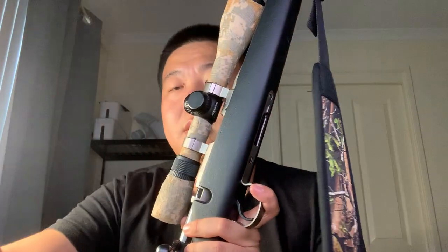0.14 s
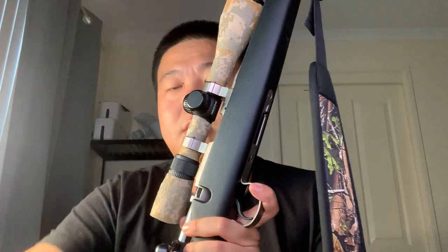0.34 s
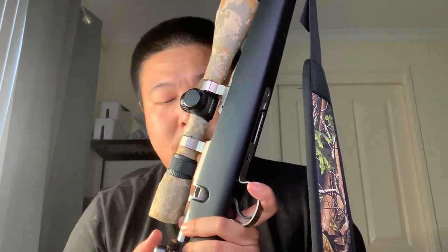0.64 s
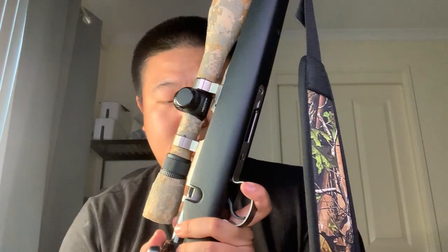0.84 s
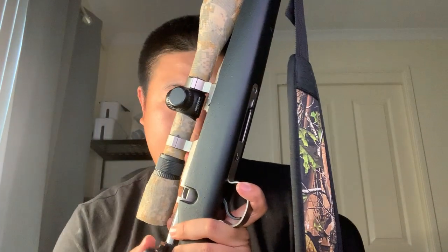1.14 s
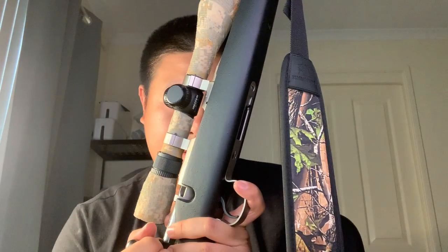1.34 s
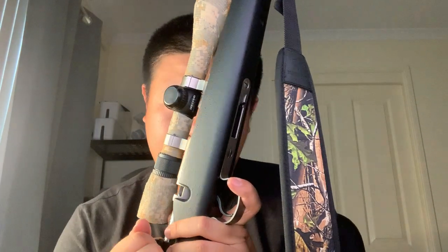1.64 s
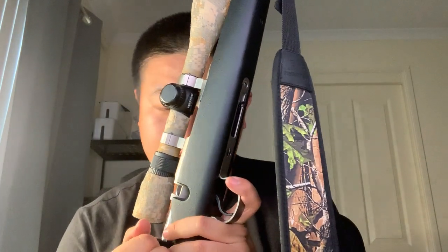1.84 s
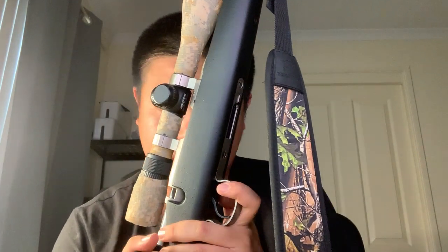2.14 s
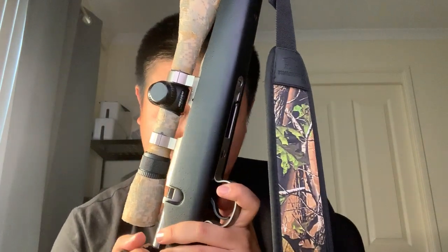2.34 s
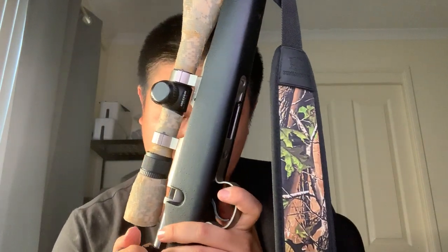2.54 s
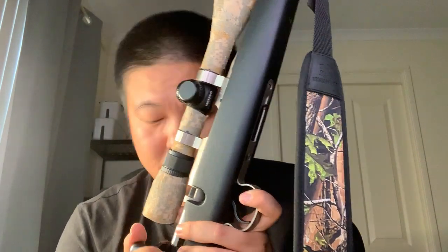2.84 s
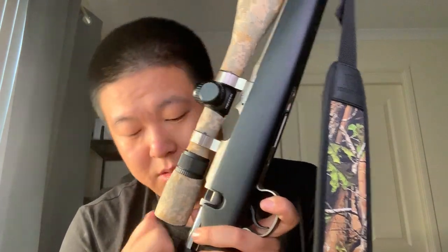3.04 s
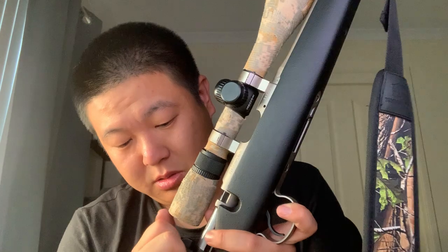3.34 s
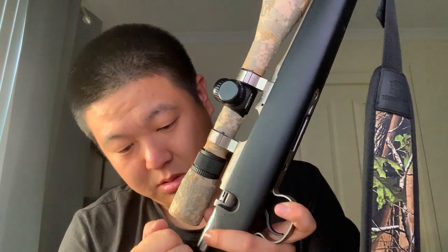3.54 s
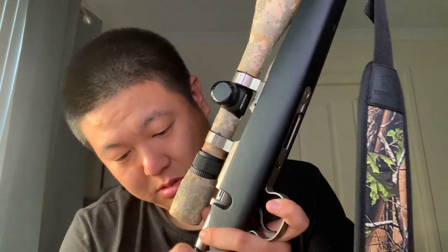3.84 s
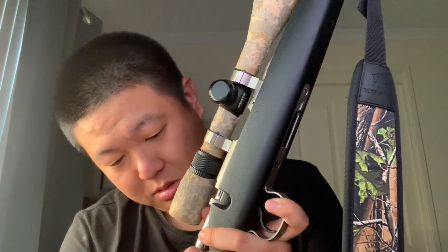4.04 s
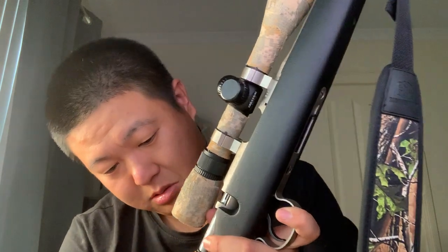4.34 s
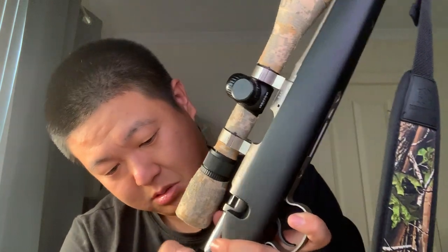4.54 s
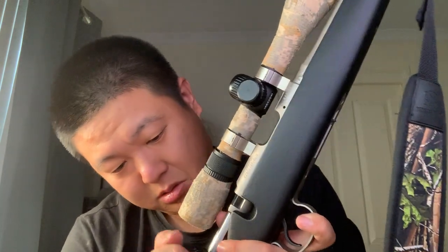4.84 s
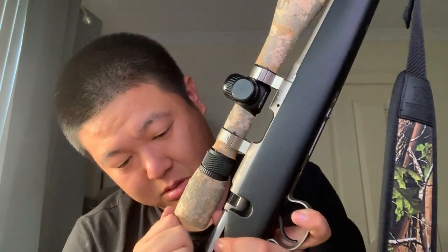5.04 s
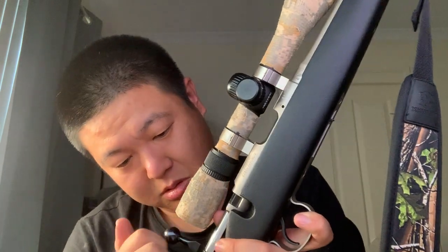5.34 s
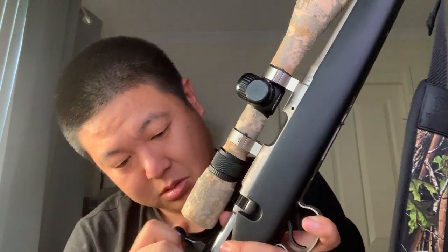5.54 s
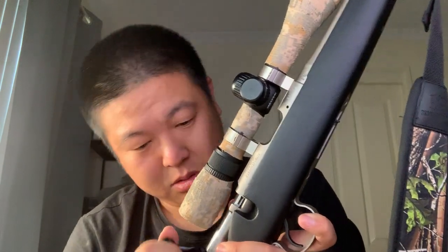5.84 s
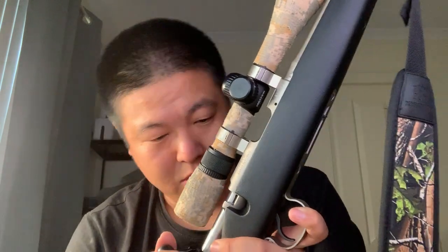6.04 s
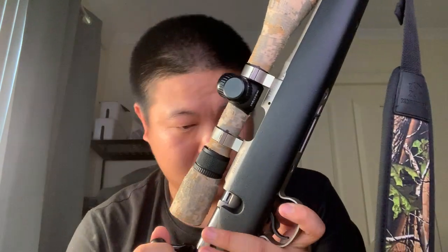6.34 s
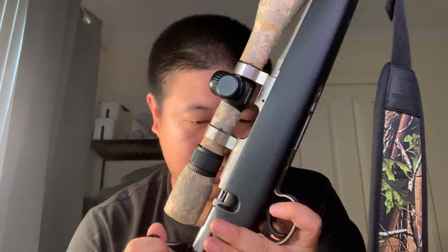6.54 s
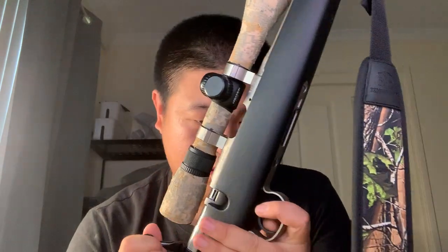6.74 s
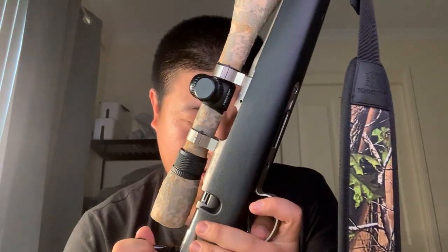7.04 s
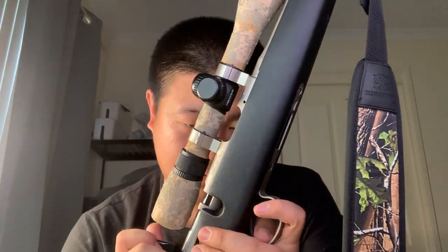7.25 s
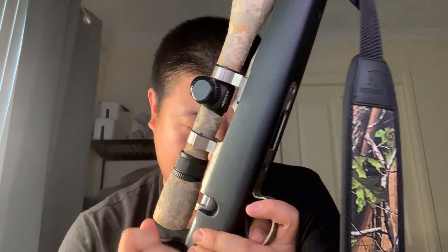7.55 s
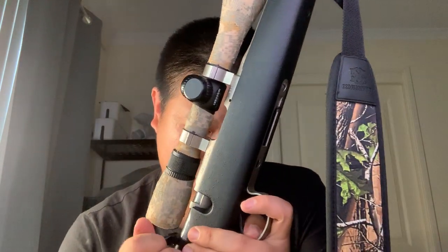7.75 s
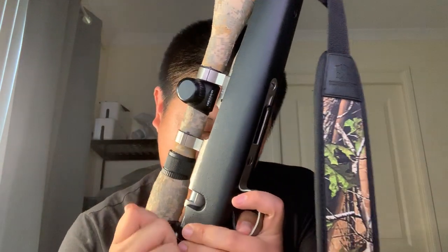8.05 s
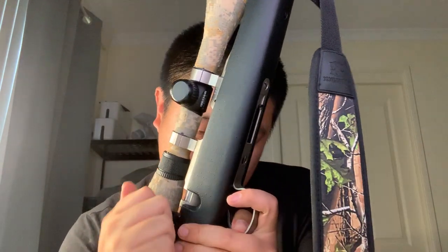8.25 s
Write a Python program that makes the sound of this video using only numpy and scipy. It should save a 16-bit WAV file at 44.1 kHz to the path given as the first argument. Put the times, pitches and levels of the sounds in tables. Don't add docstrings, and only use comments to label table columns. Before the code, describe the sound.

A hard object clatters down and rocks to rest on a desk, then a rifle bolt slams sharply amid scattered light metallic clicks in a quiet room.

```python
import sys
import numpy as np
from scipy import signal
from scipy.fft import rfft, irfft, next_fast_len
from scipy.io import wavfile
from scipy.ndimage import uniform_filter1d

SR = 44100
rng = np.random.default_rng(int(sys.argv[2]) if len(sys.argv) > 2 else 0)


def level_to_linear(level):
    exponent = np.asarray(level, float) / 20
    return 10 ** exponent


def master_out(mix):
    frames = np.transpose(np.atleast_2d(mix))
    ceiling = np.clip(frames, -1, 1)
    pcm = np.round(ceiling * 32767).astype(np.int16)
    wavfile.write(sys.argv[1], SR, pcm)


N = 370748
T = np.arange(N) / SR

# time in seconds, strength in dB,
# treble over strength in dB, bass over strength in dB.
LOCK_SLAMS = [
    (3.147, -20.5, -0.5, -19),
    (3.155, -26, 6, -5),
    (3.164, -35, 2, -1.5),
    (5.061, -25, 9, -12.5),
    (8.268, -21, -3, -21),
]
RECEIVER_CLACKS = [(1.84, -40, -16.5, -6), (2.421, -50, -17, -2), (2.436, -43, -19, -12),
                   (3.496, -56.5, 11.5, -19), (4.657, -50.5, 0.5, -15), (5.777, -53, -19, -9.5),
                   (5.814, -46.5, 5, -28), (5.931, -51.5, -6.5, -0.5), (7.615, -40, -10.5, -14),
                   (7.643, -35.5, -16, -19), (7.912, -37, -10, -16.5), (8.182, -32, -2, -13),
                   (8.259, -33, -5, -25.5), (8.332, -34.5, -3, -14.5), (8.378, -36, -17, -21)]
LUG_SNAPS = [
    (3.814, -29.5, 3.63, -26),
    (5.813, -61, 3.5, -27),
]
REBOUNDS = [
    (3.816, -30, -25.5, -22),
    (5.07, -26.5, -45.5, -22.5),
    (7.652, -42.5, -4, 3.5),
    (7.926, -36, -5.5, -24.5),
]
RECEIVER_TICKS = [(.2, -64.5, -15, -11), (1.078, -55, -33, -9), (1.405, -63.5, -14, 3),
                  (2.223, -59.5, -8, -8), (3.014, -69, -13, -3.5), (3.47, -54, -29, -16),
                  (5.854, -72, -7, 10), (6.002, -63.5, 1.5, 3), (6.119, -65.5, -16, -12),
                  (6.4, -62, -10, -2.5), (6.564, -60, -17, 2.5), (6.637, -57.5, -4, 0.5),
                  (7.043, -68.5, 0, 4.5), (7.247, -57.5, 5, 4)]
BARREL_TAPS = [(1.499, -64, -33, -3), (2.472, -53, -19.5, 8.5), (3.375, -62, -8, -4),
               (3.527, -55, -17, -15), (3.943, -35, -4.5, -16.5), (4.579, -37.5, -2.5, -7.5),
               (7.935, -26.5, -18.5, -14), (8.056, -70, -13.5, 16)]
HANDLE_TICKS = [(1.008, -44.5, -8, -16.5), (1.169, -46, -8.5, -16.5), (1.194, -48, -11, -18),
                (1.277, -51.5, -26, -12), (1.334, -58.5, -20, -6.5), (2.366, -48, 6, -11),
                (6.982, -68.5, 17, -0.5), (7.784, -58, 6, -19.5)]
SWIVEL_TICKS = [(1.209, -45, -10, -8.5), (4.144, -47, -17.5, -6.5), (4.544, -48, -9, -14),
                (4.997, -56.5, -9, -17)]
SLING_CLINKS = [(1.010, -52, -16, -12), (1.177, -60.5, -6, -18), (1.281, -64.5, -13, -15),
                (2.098, -90, 13, -8), (3.782, -72, 8, -24), (7.544, -63, 2, -17.5)]
GRIP_NUDGES = [(1.832, -49.5, -24.5, -1.5), (2.136, -49, -28, -20), (2.145, -64, -9, -10),
               (2.152, -53, -15.5, -1.5), (2.232, -73, -5, -12), (2.241, -74, -14, -3),
               (3.135, -39, -14, -11.5), (5.79, -67, -9, 5), (5.95, -64, 9.5, 3), (7.622, -45, -25, -7),
               (7.942, -48.5, -16, -6), (8.192, -44.5, -24, -16)]


def rifle_hits():
    # contacts, resonance in Hz, chatter in ms, top over treble in dB, resonance level in dB
    parts = [
        (LOCK_SLAMS, 1560, 0.7, -6, 0.43),
        (RECEIVER_CLACKS, 1511, 2.3, -17.5, 4.1),
        (LUG_SNAPS, 3480, 0.81, -6.5, 2.7),
        (REBOUNDS, 1505, 0.5, 0, 0),
        (RECEIVER_TICKS, 1500, 5.1, -7, 6),
        (BARREL_TAPS, 912, 1.03, -7.5, 1.7),
        (HANDLE_TICKS, 3160, 1.9, -2.3, 1.4),
        (SWIVEL_TICKS, 2400, 1.1, -7, -1),
        (SLING_CLINKS, 4750, 2.16, 4.5, 8.6),
        (GRIP_NUDGES, 1140, 2.4, -17, 6.1),
    ]
    hits = []
    for rows, *part in parts:
        for s, db, treble, bass in rows:
            hits.append((s, db, db + treble, db + bass, *part))
    return sorted(hits)


# frequency in Hz, level in dB, decay time t60 in seconds.
RIFLE_MODES = [(267, -4, 0.31), (335, 0, 0.091), (459.7, 2.5, 0.027), (592, -8, 0.041), (1007, -2.5, 0.04),
               (1500, -2, 0.05), (1602, -4.5, 0.06), (1780, -11.5, 0.05), (2470, -8, 0.069),
               (3600, -5, 0.0097), (4870, -9, 0.022), (6020, -9.5, 0.077), (6350, -2, 0.037),
               (6840, -4, 0.048), (10400, -13, 0.02), (12600, -4.5, 0.033)]


def steel_contacts():
    return knocks(rifle_hits(), RIFLE_MODES, crack_db=(29.0, 18.5, 22.07, 25.4), ring_db=(-10, -18, -14),
                  width=1.117, lean=0.46, upper_db=7.0)


# start in seconds, end in seconds,
# body level in dB, hiss level in dB, swell from start to end in dB.
SLIDES = [(0.33, 0.41, -71, -66, 19), (0.698, 0.791, -66.5, -91, -9), (0.76, 1.18, -74, -105, -6),
          (1.12, 1.5, -97, -90, 1), (2.4, 2.497, -86, -75, -14), (3.125, 3.15, -52, -52.5, 16),
          (3.436, 3.56, -88, -74.5, -2), (3.574, 3.672, -101, -80, -1), (5.99, 6.04, -84, -87, 0),
          (3.794, 3.823, -64.5, -55, 27), (4.53, 4.697, -82, -70, -8), (5.02, 5.07, -75, -66.5, 19),
          (5.764, 5.876, -76.5, -76, -4), (5.907, 6.025, -88, -79, -0.5), (6.417, 6.508, -93, -85.5, -2.5),
          (6.064, 6.7, -97, -94.5, 0.5), (6.95, 7.35, -93.5, -86.5, 8), (7.51, 7.578, -78, -85.5, 8),
          (7.482, 7.638, -81, -73.5, -0.5), (7.677, 7.932, -83, -80, -19), (7.98, 8.144, -86.5, -87, -23),
          (8.16, 8.204, -67.5, -57.5, 27.5), (8.197, 8.263, -65, -61, 7), (8.28, 8.402, -61, -66, -3)]
# start in seconds, end in seconds, level in dB, swell in dB.
BRUSHES = [(.33, .405, -66.5, -5), (.405, .56, -70, 0), (.58, .72, -81, -20), (2.37, 2.47, -72.5, -22.5),
           (3.82, 3.92, -70, -16), (5.53, 5.6, -85, -1.5), (5.93, 6.03, -78, -8), (6.42, 6.5, -79, 2),
           (6.97, 7.06, -82.5, -3), (7.24, 7.29, -81.5, 8), (7.5, 7.575, -66, 1), (7.73, 7.79, -71, 0),
           (8.02, 8.07, -79, 2), (8.19, 8.26, -72, -5), (8.28, 8.405, -61, -17)]
# frequency in Hz, level in dB, decay time t60 in seconds.
SLIDE_MODES = [(880, -2, .04), (1500, 3, .04), (1730, -2, 0.057), (3100, -12.5, 0.013), (5700, -14, .03)]


def slides():
    body, hiss = strokes(SLIDES)
    brush = strokes(BRUSHES)[0]
    grit = rng.standard_normal(N) * level_to_linear(3.2 * walk(150) + 4.0 * walk(43))
    steel = unit(ring([grit] * len(SLIDE_MODES), SLIDE_MODES))
    scrape = level_to_linear(0.5) * steel + level_to_linear(-11.5) * unit(band(grit, 620, 3300))
    fine_hiss = unit(band(band(grit, 2900, 6000, order=1), 2100, 6800, order=3))
    rustle = unit(band(grit, 5800, 14200, order=3))
    return body * scrape + hiss * fine_hiss + brush * rustle


# time in seconds, level in dB, decay time t60 in seconds.
STOCK_KNOCKS = [
    (3.16, -39.5, 0.73),
    (5.064, -47, 0.15),
    (5.932, -61.5, 1),
    (7.254, -64, 0.36),
    (7.653, -58, 0.24),
    (8.185, -45.5, 0.082),
    (8.264, -58, 0.95),
]


def stock():
    stock_hz = 382
    out, t = np.zeros(N), T[:6000]
    tone = np.sin(2 * np.pi * stock_hz * t)
    hand = np.clip((.105 - t) / 0.036, 0, 1)
    for s, db, t60 in STOCK_KNOCKS:
        i = int(s * SR)
        out[i:i + len(t)] += level_to_linear(db + 3.0 - 60 * t / t60) * hand * tone
    return out


def landings(rows, chatter_ms, softness, top_db):
    hits = []
    for s, db, treble, bass, hz in rows:
        ms = chatter_ms * level_to_linear(softness * bass)
        hits.append((s, db, db + treble, db + bass, hz, ms, top_db, 0))
    return hits


# time in seconds, strength in dB, treble over strength in dB,
# bass over strength in dB, contact resonance in Hz.
DESK_THUDS = [(.331, -58.5, 4, -8.5, 1730), (.361, -58.5, 0.35, -2.5, 2980), (.405, -28, 0.5, -1, 824),
              (.411, -30, -27.5, 17.5, 860), (.418, -23, -21.5, -8, 2900), (.4195, -26, -20, -4, 1200),
              (.429, -34, 9.5, 12, 2900), (.448, -24.5, -7.5, 1.5, 1440), (.499, -33.5, -1.5, -9.5, 2900),
              (.522, -34, -6, -6, 2870), (.541, -41.5, -10, -1, 3770)]
# frequency in Hz, level in dB, decay time t60 in seconds.
DESK_MODES = [(95, -14, 0.2), (137.3, -11.5, 0.67), (178, -4.5, 0.088), (214.6, 4.5, 0.18),
              (265, -14, 0.082), (326.1, -6.5, 0.22), (422, -5, 0.12), (559, -16, 0.1), (860, -6.5, 0.049),
              (1180, -3, 0.02), (1560, -2, 0.031), (2260, 0.5, .02), (2800, 4.5, 0.021),
              (3132, -2.5, 0.011)]


def desk_thuds():
    hits = landings(DESK_THUDS, chatter_ms=0.41, softness=.6, top_db=-2.5)
    return knocks(hits, DESK_MODES, crack_db=(3, 22.7, 21, 31), ring_db=(-11, -13, -9),
                  width=1.1, lean=0.29, upper_db=-0.4)


# time in seconds, strength in dB, treble over strength in dB,
# bass over strength in dB, contact resonance in Hz.
DESK_CLACKS = [
    (.561, -8, -32.5, -12.5, 1770),
    (.576, -9, -21.5, -23.5, 2978),
    (.578, -12, -29, -20, 1760),
    (.584, -22.5, -22, -15.5, 2696),
    (.641, -15.5, -24.5, -12, 1500),
    (.669, -31.5, -19.5, -7.5, 2800),
    (.689, -34.5, -27.5, -2, 974),
    (.705, -41, -21.5, -5.5, 2102),
]
# frequency in Hz, level in dB, decay time t60 in seconds.
OBJECT_MODES = [(280.6, -7.5, 0.044), (448, 7, 0.032), (653, -2.5, 0.035), (830, -12.5, 0.11),
                (945, -10, 0.077), (1250, -11, 0.035), (1590, -4.5, 0.075), (1770, 8.5, .06),
                (2340, -9, 0.059), (2590, -6.5, 0.081), (2750, -0.5, 0.06), (2790, 0, 0.033),
                (3180, -14, 0.03), (4940, -3, 0.073)]


def object_clacks():
    hits = landings(DESK_CLACKS, chatter_ms=0.5, softness=0.15, top_db=-13)
    return knocks(hits, OBJECT_MODES, crack_db=(4.6, 9.2, 30.5, 24.5), ring_db=(-3, -19, -14),
                  width=1.15, lean=0.12, upper_db=-4.5)


# centre in Hz, decay time t60 in seconds, level in dB.
ROOM = [(117, 0.51, -29), (229, 0.31, -29), (494, 0.2, -22.5), (974, 0.25, -25.5), (1920, 0.27, -27.5),
        (2800, 0.38, -25), (3980, 0.36, -24), (5806, 0.36, -22), (8430, 0.25, -23.5), (10600, 0.5, -24)]


def room():
    t = np.arange(int(.6 * SR)) / SR
    noise = even_noise(len(t))
    lumps = walk(400)
    tail = 0
    for k, (hz, t60, db) in enumerate(ROOM):
        decay = level_to_linear(db - 23.5 - 60 * t / t60 + 1.2 * lumps[k * len(t):][:len(t)])
        tail = tail + (-1) ** k * decay * unit(band(noise, hz / 1.292, min(hz * 1.343, 14600)))
    onset = np.clip((t - .0008) / 0.00038, 0, 1)
    early = 1 + 3 * np.exp(-t / 0.005)
    mid, side = tail * onset * early * np.exp(-(t / 0.17) ** 2)
    return mid + side * np.array([[1], [-1]])


# time in seconds, level in dB.
RUMBLE_DB = [(0, -57), (0.599, -82.5), (1.2, -67.5), (2.8, -65), (3.5, -65), (5.002, -67), (5.4, -71.5),
             (6.301, -73.5), (6.6, -60.5), (7.1, -61.5), (7.402, -62.5), (8.41, -60.5)]
# time in seconds, frequency in Hz.
RUMBLE_HZ = [(0, 72), (1.5, 73), (3, 72), (4.5, 78), (5.2, 85), (6.2, 88), (6.6, 97), (7.5, 96), (8.41, 99)]


def rumble():
    hz = np.interp(T, *np.transpose(RUMBLE_HZ)) + 5.9 * walk(15)
    level = level_to_linear(np.interp(T, *np.transpose(RUMBLE_DB)) + 1.0 + 3.5 * walk(12))
    beat_hz = 12 + 1.5 * walk(4.9)
    beat = 1 + 0.47 * np.cos(2 * np.pi * np.cumsum(beat_hz) / SR)
    tone = level * beat * np.sin(2 * np.pi * np.cumsum(hz) / SR)
    return tone * level_to_linear(np.array([[2.5], [-2.5]]))


# frequency in Hz, level in dB.
HUM = [(304, -89), (405.3, -88), (224, -81.5), (400, -98)]


def hum():
    return sum(level_to_linear(db) * unit(band(rng.standard_normal(N), hz - 5, hz + 5, order=1)) for hz, db in HUM)


# frequency in Hz, density in dB per Hz.
FLOOR = [(15, -68.5), (25, -28.5), (49, -11), (70, 6), (102, -13), (190, -22.5), (293, -29), (326, -16),
         (405, -31), (439, -37.5), (1400, -42), (1520, -43.5), (5430, -49), (11300, -47.5), (16000, -51.5)]


def hiss():
    hz, db = np.transpose(FLOOR)
    f = np.maximum(np.arange(N // 2 + 1) * SR / N, 1)
    colour = level_to_linear(np.interp(np.log(f), np.log(hz), db)) / (1 + (f / 14700) ** 40)
    mid, side = rfft(rng.standard_normal((2, N))) * colour
    width_hz, width = [100, 200, 700, 2400, 8000, 14000], [0.2, 0.56, 0.71, 1.3, 1.2, 1.1]
    side = side * np.interp(np.log(f), np.log(width_hz), width)
    air = irfft(np.array([mid + side, mid - side]), N)
    air = air / np.sqrt(np.mean(band(air.mean(axis=0), 130, 16000) ** 2))
    return level_to_linear(-70.5) * (air - 1.2 * band(air, 45, 120))


def knocks(hits, modes, crack_db, ring_db, width, lean, upper_db):
    graze_db, graze_ms = -18.5, 1.9
    evenness = 0.84
    lead = 400
    t = (np.arange(1500) - lead) / SR
    age_ms = abs(t) * 1000
    end = min(int((hits[-1][0] + 1) * SR), N)
    force = 1e-12 * np.cos(np.outer([.05, .3, 1, .3, 1.5, .4], np.arange(end + len(t))))
    noises = rng.standard_normal((len(hits), len(t)))
    for (s, middle_db, treble_db, bass_db, hz, ms, top_db, focus_db), noise in zip(hits, noises):
        graze = level_to_linear(graze_db) * np.exp(-age_ms / graze_ms)
        shape = np.where(t < 0, graze, np.exp(-age_ms / np.clip(ms, .1, 12)))
        tones = rfft(noise * shape)
        burst = irfft(tones / abs(tones) ** evenness, len(t)) * np.sqrt(shape)
        snap = 0.23 * min(1, 1 / ms ** 2) * (t == 0)
        burst = 0.84 * burst / np.sqrt(np.sum(burst ** 2)) + snap
        i = int(s * SR) - lead
        now = slice(i, i + len(t))
        force[:3, now] += np.outer(level_to_linear(np.array([bass_db, middle_db, treble_db])), burst)
        force[3, now] += level_to_linear(middle_db + focus_db) * band(burst, hz / width, hz * width)
        force[4, now] += level_to_linear(treble_db + top_db) * burst
        force[5, now] += level_to_linear(middle_db + lean * (treble_db - middle_db) + upper_db) * burst
    bass, middle, treble, contact, top, upper = force[:, :end]
    bass = band(bass, 63.0, 730)
    middle = band(middle, 920, 2400, order=3) + band(upper, 2100, 4240, order=3)
    treble = band(band(treble, 2200, 8500, order=1), 2500, 8000, order=3) + band(top, 6900, 13800, order=3)
    push = []
    for hz, _, _ in modes:
        if hz < 750:
            push.append(level_to_linear(ring_db[0]) * bass)
        elif hz < 3900:
            push.append(level_to_linear(ring_db[1]) * middle)
        else:
            push.append(level_to_linear(ring_db[2]) * treble)
    crack = sum(level_to_linear(db) * x for db, x in zip(crack_db, (bass, middle, treble, contact)))
    return np.pad(ring(push, modes) + crack, (0, N - end))


def ring(push, modes):
    out = 0
    for force, (hz, db, t60) in zip(push, modes):
        r = np.exp(-np.log(1000) / (t60 * SR))
        turn = 2 * np.pi * hz / SR
        out = out + level_to_linear(db) * signal.lfilter([0, np.sin(turn)], [1, -2 * r * np.cos(turn), r * r], force)
    return out


def strokes(rows):
    out = np.zeros((len(rows[0]) - 3, N))
    for start, end, *db, swell_db in rows:
        i = slice(int(start * SR), int(end * SR))
        t = T[i]
        fade = np.clip(np.minimum(t - start, end - t) / 0.0095, 0, 1)
        swell = level_to_linear(swell_db * ((t - start) / (end - start) - .5))
        out[:, i] += np.outer(level_to_linear(np.array(db)), fade * swell)
    return out


def even_noise(length):
    noise = rng.standard_normal((2, length))
    for _ in range(3):
        cells = signal.stft(noise, nperseg=384, noverlap=288)[2]
        noise = signal.istft(cells / abs(cells), nperseg=384, noverlap=288)[1][:, :length]
    return noise


def walk(rate):
    k = int(SR / rate)
    held = np.repeat(rng.standard_normal(N // k + 1), k)
    return unit(uniform_filter1d(uniform_filter1d(held, k), k)[:N])


def band(x, lo_hz, hi_hz, order=2):
    return signal.sosfilt(signal.butter(order, [lo_hz, hi_hz], "band", fs=SR, output="sos"), x)


def unit(x):
    return x / np.sqrt(np.mean(x ** 2))


def ports(x, lead, balance):
    size = next_fast_len(N)
    f = np.arange(size // 2 + 1) * SR / size
    level = level_to_linear(np.interp(f, *np.transpose(balance)) / 2)
    tilt = level * np.exp(.5j * np.interp(f, *np.transpose(lead)))
    return irfft(rfft(x, size) * np.array([tilt, 1 / tilt]), size)[:, :N]


# frequency in Hz, left minus right in dB.
RIFLE_PORTS = [(0, -1), (690, 1.5), (1550, -0.96), (4300, -1.5), (6500, -7), (9000, -11), (12000, -11.5),
               (16400, -19)], [(60, 4.5), (110, 4.5), (200, 4.5), (380, 9), (700, 7), (1290, -9),
               (2380, -0.5), (4400, -4), (8120, -1.5), (15000, -0.5)]
DESK_PORTS = [(0, 0), (1030, 4.1), (1380, 1.8), (2500, 2.4), (2760, -1.0), (4050, -0.0), (5510, -3.9),
              (6550, -0.7), (7410, -3.5), (9650, -2.0), (10900, -0.4), (13100, 0.3), (15300, 3.0),
              (16400, 3.4)], [(60, 4.5), (110, 5.5), (200, 4.5), (380, 2.5), (700, 2.0), (1290, 0.0),
              (2380, 1.0), (4400, 0.0), (8120, 1.5), (15000, 0.0)]


def scene():
    rifle = steel_contacts() + slides()
    desk = desk_thuds() + object_clacks()
    tail = room()
    board = band(desk, 27, 710, order=1)
    desk_middle = band(desk - board, 250, 2800, order=1)
    desk_bright = level_to_linear(-5) * band(desk, 5000, 15000)
    air = signal.oaconvolve((desk_middle + desk_bright + rifle)[None], tail, axes=1)[:, :N]
    desk = desk + signal.oaconvolve(board, tail[0])[:N]
    direct = ports(rifle + stock(), *RIFLE_PORTS) + ports(desk, *DESK_PORTS)
    return direct + air + rumble() + hum() + hiss()


def band_limit(x):
    return signal.sosfilt(signal.butter(12, 16800, fs=SR, output="sos"), x)


def record(dry):
    low_cut = signal.butter(2, 30, "high", fs=SR, output="sos")
    top_cut = signal.butter(8, 15300, fs=SR, output="sos")
    mix = signal.sosfilt(top_cut, signal.sosfilt(low_cut, dry))
    return band_limit(mix)


dry = scene()
out = record(dry)
master_out(out)
```